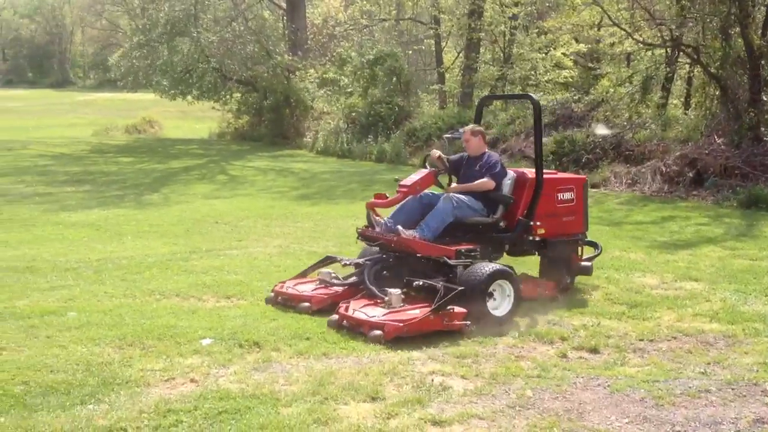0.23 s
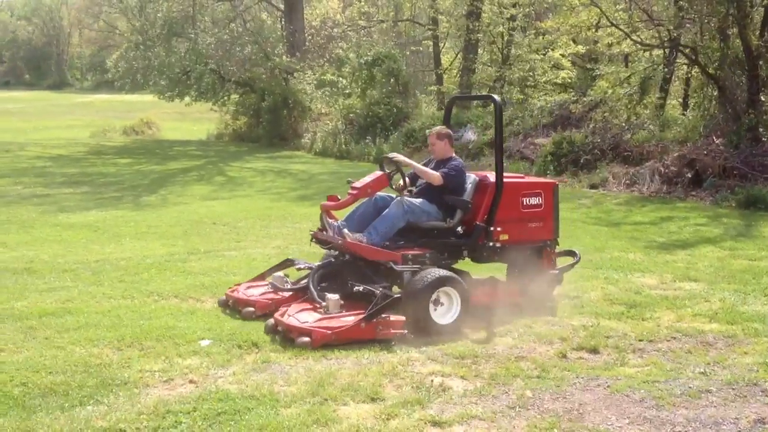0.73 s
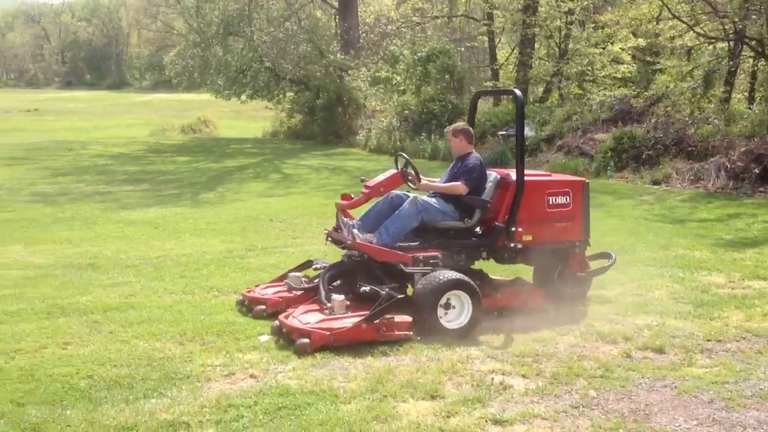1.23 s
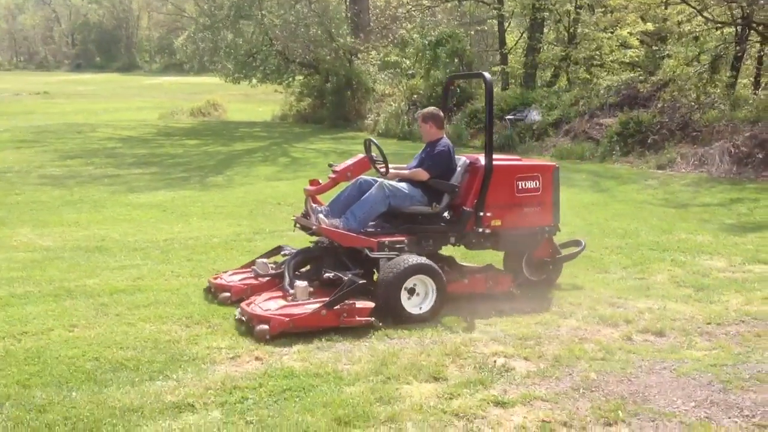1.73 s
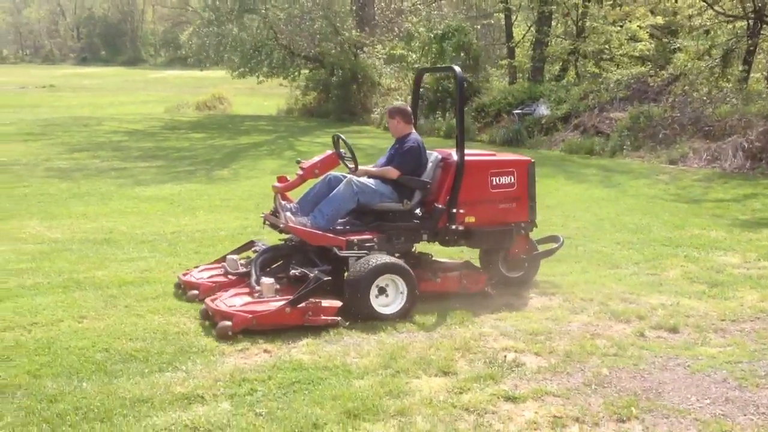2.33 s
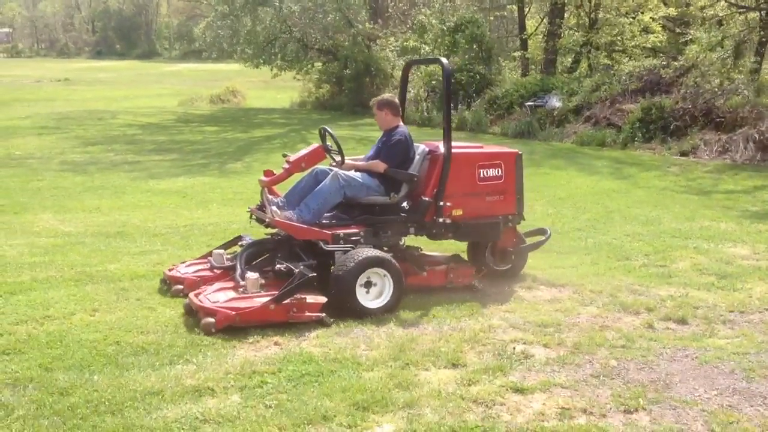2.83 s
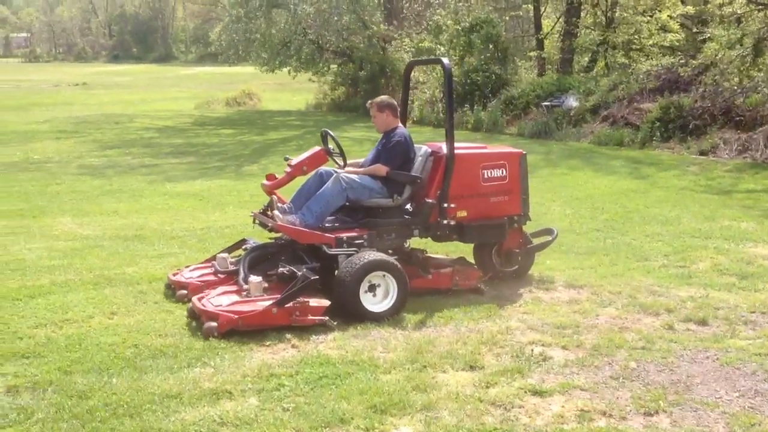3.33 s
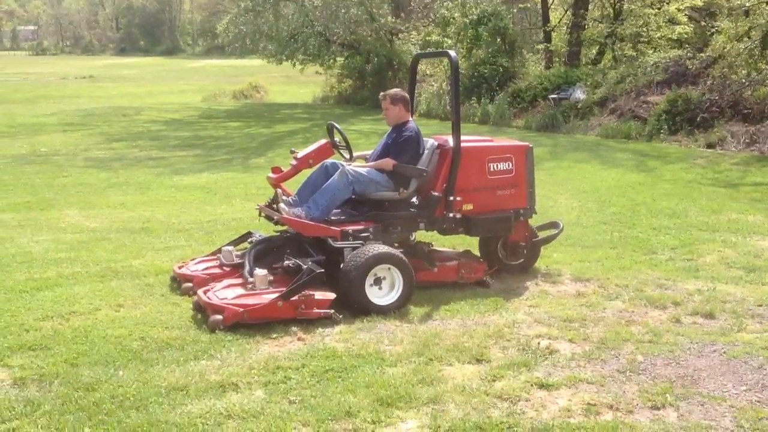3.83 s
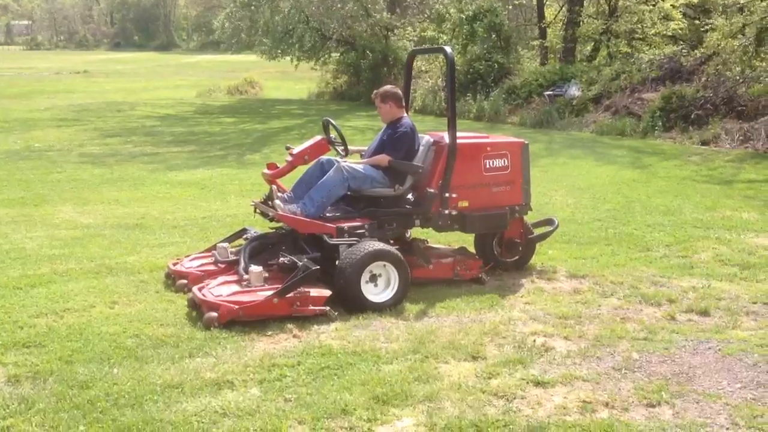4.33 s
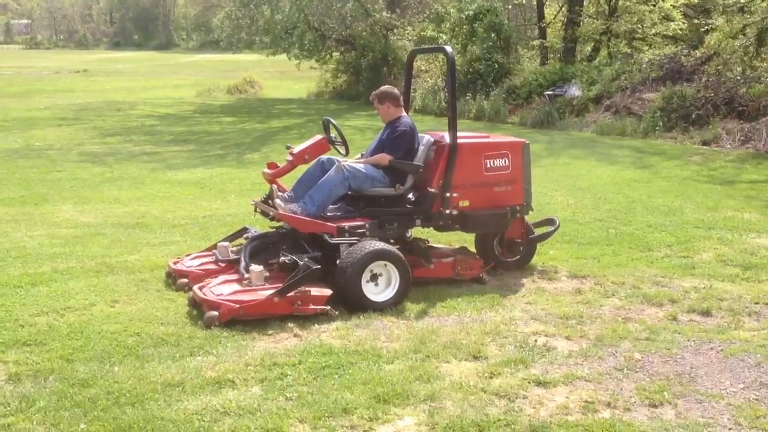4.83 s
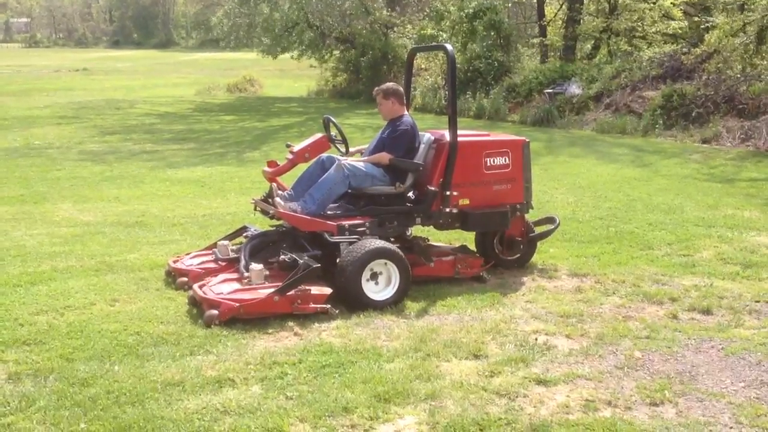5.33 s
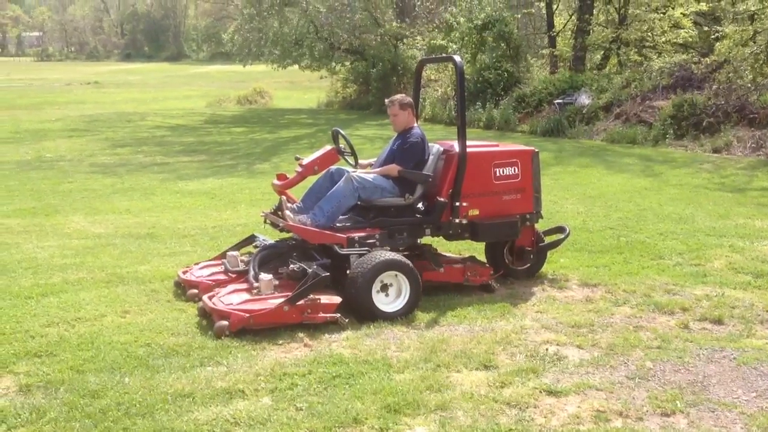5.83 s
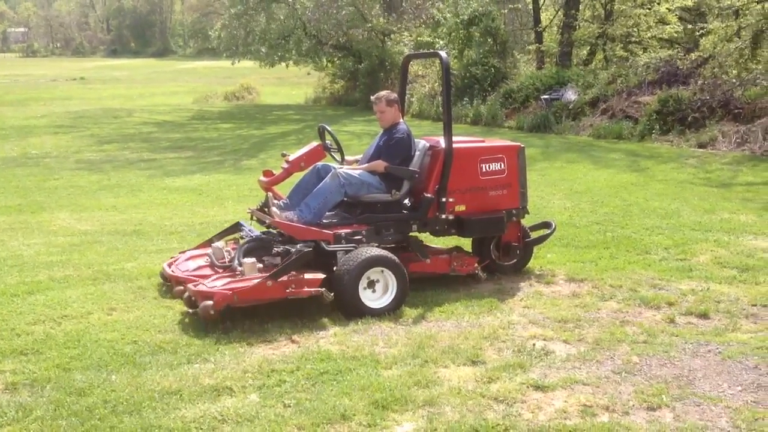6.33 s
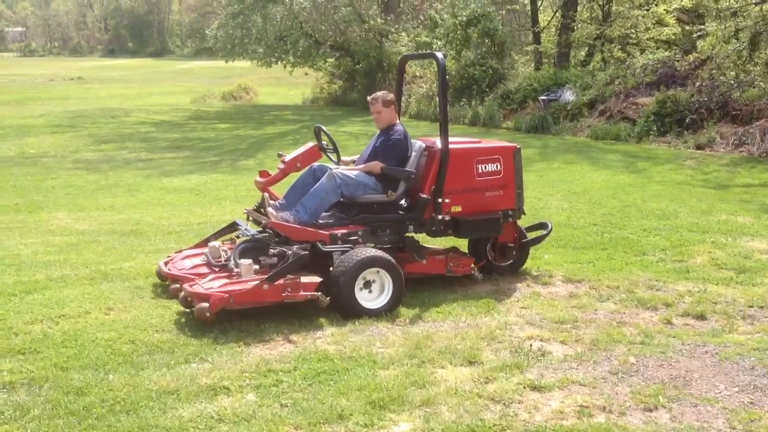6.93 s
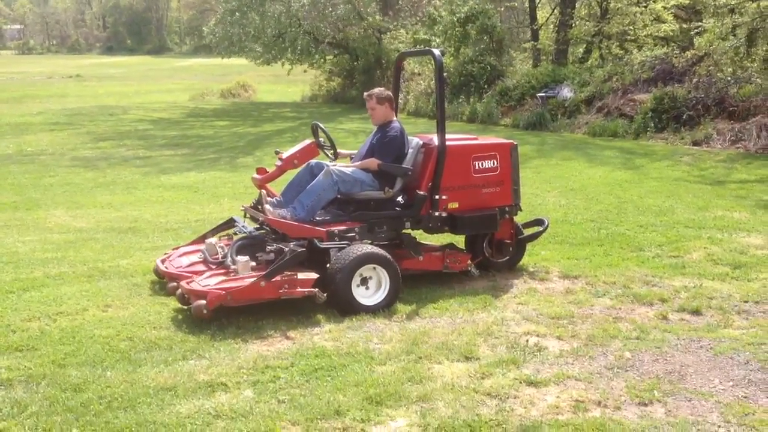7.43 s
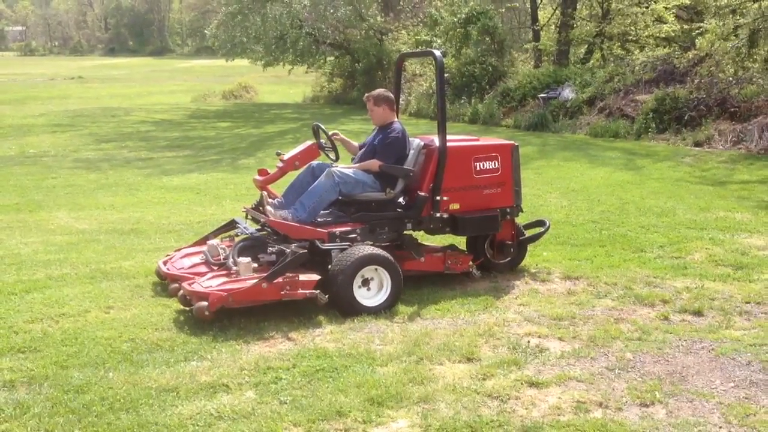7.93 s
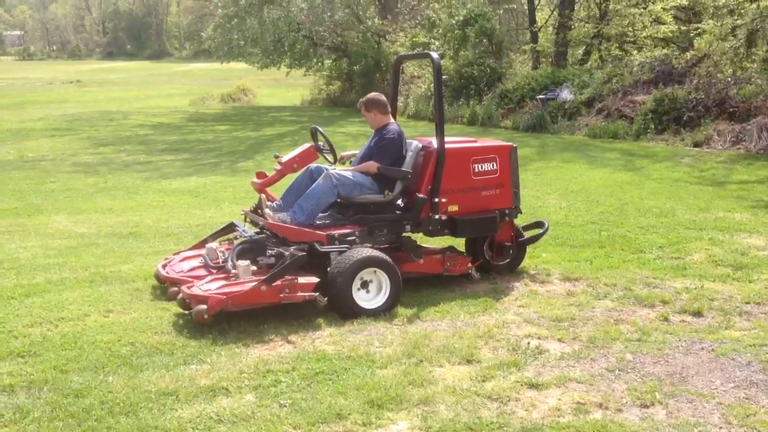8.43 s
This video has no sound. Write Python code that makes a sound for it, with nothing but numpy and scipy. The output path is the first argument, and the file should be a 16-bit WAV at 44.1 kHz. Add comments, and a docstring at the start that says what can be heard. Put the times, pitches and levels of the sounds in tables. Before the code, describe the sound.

A diesel riding mower runs at working throttle outdoors on grass, a rough roar with thin mechanical whine and wavering blade hum. Decks squeak and rattle in the first few seconds. At about five seconds the engine winds down quickly to a much quieter, knocking idle, and a lever clanks at six. Wind gusts rumble, flutter and slap on a small camera microphone, strongest at the start, around two to three seconds, and again near the end.

```python
"""On a lawn, a three-cylinder diesel riding mower drops from working throttle to idle at about five seconds.
Firing tones, a fan tone, pump whine and shaped noise make the engine; wavering tones and a rush, the blades.
Decks squeak (unsteady overtone stacks) and rattle (bright noise bursts), and a lever clanks (resonant chatter).
Gusts buffet the microphone of a small camera: low rumble, higher flutter, crackle, slaps and small knocks."""
import sys
import numpy as np
from scipy import signal
from scipy.fft import rfft, irfft, next_fast_len
from scipy.io import wavfile
from scipy.ndimage import uniform_filter1d

SR = 44100
rng = np.random.default_rng(int(sys.argv[2]) if len(sys.argv) > 2 else 0)


def inscribe(sig):
    """Save sig as 16-bit PCM at rate SR to the path in sys.argv[1].

    A 1-D sig is mono; a 2-D sig holds one channel per row.
    Samples are clipped to [-1, 1] before scaling.
    """
    pcm = np.round(np.clip(np.atleast_2d(sig).T, -1, 1) * 32767)
    wavfile.write(sys.argv[1], SR, pcm.astype(np.int16))


def ratio_of_db(decibels):
    """Turn decibels (scalar or array-like) into linear amplitude factors; 0 dB maps to 1."""
    return 10 ** (np.asarray(decibels, float) / 20)


N = 382347

# resonances of panels and hood: (centre [Hz], width [Hz], lift or dip [dB])
PANELS = [(545, 560, 3.5), (1140, 92, 0), (790, 47, -0.5), (1423, 540, 14.5), (2135, 300, 10),
          (2272, 122, 2.5), (2414, 120, -8), (3320, 510, -5.5), (3766, 330, 4), (4900, 570, 4.5),
          (7380, 300, 9.5), (8000, 420, 9), (10800, 370, 1), (14300, 4300, -16)]


def rms_one(x):
    """Scale to rms 1."""
    return x / np.sqrt(np.mean(x ** 2) + 1e-20)


def in_time(rows):
    """Columns of a table, interpolated to one value a sample."""
    s, *columns = np.transpose(rows)
    return [np.interp(np.arange(N) / SR, s, column) for column in columns]


def bell_db(hz, centre_hz, width_hz, lift_db):
    """Lift of one bell-shaped resonance, lift_db at its centre and half of that at its edges."""
    return lift_db / (1 + (2 * (hz - centre_hz) / width_hz) ** 2)


def coloured(x, spectrum, lifts=()):
    """Shape by a spectrum and bell-shaped resonances; rms 1."""
    size = next_fast_len(N)
    hz = np.fft.rfftfreq(size, 1 / SR) + 1
    points = np.array(spectrum)
    gain_db = np.interp(np.log(hz), np.log(points[:, 0]), points[:, 1], left=-60, right=-70)
    for lift in lifts:
        gain_db = gain_db + bell_db(hz, *lift)
    return rms_one(irfft(rfft(x, size) * ratio_of_db(gain_db), size)[:N])


def drift(corner_hz):
    """Slow chance of spread 1: noise through two equal low-pass poles, drawn every 40 samples."""
    r = np.exp(-80 * np.pi * corner_hz / SR)
    noise = rng.standard_normal(N // 40 + 2002)
    slow = signal.lfilter([1], [1, -2 * r, r * r], noise)[2000:]  # drops the filter's start
    return np.interp(np.arange(N) / 40, np.arange(len(slow)), rms_one(slow))


def resonance(x, hz, width_hz):
    """Two-pole band-pass with gain near 1 on top."""
    r = np.exp(-np.pi * width_hz / SR)
    zeros = np.array([1, 0, -1]) * (1 - r * r) / 2
    poles = [1, -2 * r * np.cos(2 * np.pi * hz / SR), r * r]
    return signal.lfilter(zeros, poles, x + 1e-18)


def add(out, s, piece):
    """Mix a short sound in at a time."""
    i = max(round(s * SR), 0)
    out[i:i + len(piece)] += piece[:N - i]


def engine(per_s, fan_db, roar_db, hiss_db):
    """Low orders as tones, a five-fold fan tone, a roar that knocks at each firing, and a grainy hiss."""
    # low tones: (multiple of firing rate, level [dB])
    firing_orders = [(2, -56), (3, -52), (4, -54), (8, -54)]
    # knock strength of each cylinder in turn: level [dB]
    cylinder_db = [0, -3, -5]
    # spectrum of exhaust and cooling roar: (frequency [Hz], density [dB])
    roar_spectrum = [(35, -68), (60, -50), (141, -14.5), (333, -3.5), (374, -10), (540, -15.5), (731, -12),
                     (1130, -24.5), (2220, -18), (2500, -20), (4880, -21), (6150, -31), (15200, -50.5)]
    # spectrum of belts and fan air: (frequency [Hz], density [dB])
    hiss_spectrum = [(240, -51), (400, -16.5), (882, -7), (1040, -19.5), (2100, -6.5), (2410, -2.5),
                     (6280, -15.5), (8260, -11.5), (11700, -21.5), (15200, -18)]
    firings = np.cumsum(per_s * (1 + .0012 * drift(6))) / SR  # running count
    tones = sum(ratio_of_db(db + 3 * drift(6)) * np.sin(2 * np.pi * k * firings) for k, db in firing_orders)
    fan_level_db = fan_db + 1.5 * drift(6) + 2 * drift(30)
    fan = ratio_of_db(fan_level_db) * np.sin(10 * np.pi * firings + .3 * drift(15))

    number = firings.astype(int)
    strength_db = np.array(cylinder_db)[number % 3] + 1.5 * rng.standard_normal(N)[number]
    knock = ratio_of_db(strength_db) * np.exp(-5 * (firings % 1))
    steady = (per_s / 62) ** 3.5  # air rush grows with speed and buries the knocks
    pulsing = (steady + knock) / (steady + .2)

    # valve gear and loose fasteners tick at random, 8 per firing on average, 11 dB over the roar's grain
    ticks = ratio_of_db(11) * (rng.random(N) < 8 * per_s / SR)
    roar_grain = (ratio_of_db(0.69 * drift(19)) + ticks) * rng.standard_normal(N)
    roar = coloured(pulsing * roar_grain, roar_spectrum, PANELS)
    hiss = coloured(ratio_of_db(0.99 * drift(73)) * rng.standard_normal(N), hiss_spectrum, PANELS)
    roar = ragged_bands(roar, depth_db=2.8, width_hz=110)
    hiss = ragged_bands(hiss, depth_db=2.5, width_hz=54)
    return tones + fan + pump(firings, per_s) + ratio_of_db(hiss_db) * hiss + ratio_of_db(roar_db) * roar


def pump(firings, per_s):
    """Hydraulic pump and gears whine on thin lines locked to engine speed, sinking between idle and full."""
    # pump whine: (multiple of stroke rate, level at full speed [dB], level at idle [dB])
    pump_orders = [(1, -50, -60), (2, -46, -55), (3, -54, -51), (4, -60, -54), (4.5, -50, -64),
                   (6.5, -57, -59), (7, -55, -70), (8, -57, -70), (8.5, -66, -57), (9, -51, -70),
                   (10, -54, -70), (11, -58, -72)]
    # gear whine: (multiple of firing rate, level at full speed [dB])
    gear_whines = [(10, -46), (20.52, -49), (30.42, -46.5), (35.73, -55)]
    strokes_per_firing = 5.72
    fast = (per_s - per_s.min()) / np.ptp(per_s)  # 0 at the slowest, 1 at the fastest
    slack_db = -30 * fast * (1 - fast)
    lines = [(k * strokes_per_firing, idle_db + fast * (full_db - idle_db))
             for k, full_db, idle_db in pump_orders]
    lines += [(k, full_db - 30 * (1 - fast)) for k, full_db in gear_whines]
    return sum(ratio_of_db(db + slack_db + 3 * drift(5)) * np.sin(2 * np.pi * k * firings) for k, db in lines)


def ragged_bands(x, depth_db, width_hz):
    """Random narrow ripple makes noise streaky, slightly tonal, shifting slowly between two patterns; rms 1."""
    size = next_fast_len(N)
    noise = rng.standard_normal((2, size // 2 + 1))
    ripple = uniform_filter1d(noise, max(round(width_hz * size / SR), 1))
    first, second = irfft(rfft(x, size) * ratio_of_db(depth_db * rms_one(ripple)), size)[:, :N]
    share = .5 + .5 * np.tanh(1.5 * drift(2))
    return rms_one(share * first + (1 - share) * second)


def blades(drone_db):
    """Several blades at nearly equal speed give wavering tones over a hollow rush under the decks."""
    # blade tones: (frequency [Hz], level [dB], wander [Hz])
    blade_tones = [(144.4, -15.5, 2.12), (208.8, -4.5, 3), (245, -13, 4.06), (283.3, -3, 3.49),
                   (433, -15.5, 2.18), (764, -14, 8.19)]
    # spectrum of the rush of air: (frequency [Hz], density [dB])
    air_spectrum = [(450, -15), (700, 1), (900, 4), (1100, -11.5), (1500, -31), (3000, -17)]
    hum = sum(ratio_of_db(db) * wavering(hz, wander_hz) for hz, db, wander_hz in blade_tones)
    swell_db = 2 * drift(12)
    rush = coloured(ratio_of_db(swell_db) * rng.standard_normal(N), air_spectrum)
    return ratio_of_db(drone_db) * (hum + ratio_of_db(-3.5) * rush)


def wavering(hz, wander_hz):
    """A tone that wanders in pitch and swells as near-equal blades beat; rms 1."""
    turns = np.cumsum(hz + wander_hz * drift(3)) / SR
    swell_db = 3.5 * drift(4) + 2 * drift(20)
    return rms_one(ratio_of_db(swell_db) * np.sin(2 * np.pi * turns))


def squeaks():
    """Stick-slip tones of dry joints: an overtone stack with unsteady pitch, swelling and fading."""
    # squeaks: (time of middle [s], half-length [s], start pitch [Hz], glide over the squeak [Hz],
    # level before panel lift [dB], fall per overtone [dB])
    squeak_rows = [(.585, .06, 2190, 0, -17, 25), (.578, .045, 2660, -80, -22, 6),
                   (.595, .02, 3800, 0, -30, 30), (.68, .02, 2200, 0, -27, 20),
                   (.915, .022, 1860, 0, -22, 9), (.91, .012, 3700, 0, -26, 25),
                   (.905, .01, 4900, 0, -32, 30), (1.015, .06, 1860, 0, -26, 8),
                   (1.025, .045, 2150, 0, -26, 20), (1.025, .03, 5550, 0, -35, 30),
                   (1.02, .04, 3750, 0, -30, 30), (1.01, .03, 2800, 0, -30, 20),
                   (1.035, .035, 2650, 450, -26, 14), (1.03, .045, 4750, 0, -28, 30),
                   (1.03, .045, 7500, 0, -40, 30), (5.78, .02, 3000, 0, -39, 25),
                   (6.04, .09, 540, 460, -28, 10)]
    blur_hz = 11  # line width of a squeak at 2 kHz; higher and lower ones are wider
    out = np.zeros(N)
    for s, length, hz, glide_hz, level_db, fall_db in squeak_rows:
        t = np.arange(round(2 * length * SR)) / SR
        glide = np.cumsum(hz + glide_hz * t / (2 * length)) / SR
        wander = np.sqrt(2 * np.pi * blur_hz / SR) * (1 + abs(hz - 2000) / 3000)
        phase = 2 * np.pi * glide + wander * np.cumsum(rng.standard_normal(SR)[:len(t)])
        stack = sum(ratio_of_db(-fall_db * k + panel_lift_db((k + 1) * hz)) * np.sin((k + 1) * phase)
                    for k in range(5))
        swell = np.exp(-8 * (t / length - 1) ** 2)
        add(out, s - length, ratio_of_db(level_db) * stack * swell)
    return out


def panel_lift_db(hz):
    """How much the panel resonances centred above 6 kHz lift a tone."""
    return sum(bell_db(hz, *panel) for panel in PANELS if panel[0] > 6000)


def rattles():
    """Loose parts rattle: bursts of bright grit that swell and die, coloured by the panels."""
    # rattles: (start [s], strength before swell and filters [dB], rise [s], 60 dB decay [s], top edge [Hz])
    rattle_rows = [(.128, -27, 0.0024, 0.13, 5960), (0.157, -17.5, 0.0095, 0.17, 5560),
                   (.2, -26, 0.0074, 0.12, 7900), (0.276, -25, 0.0022, 0.056, 5550),
                   (0.353, -23.5, 0.0022, 0.048, 5630), (0.56, -11, 0.029, 0.16, 6500),
                   (.674, -19.5, 0.0034, 0.06, 5370), (0.993, -19, 0.017, 0.14, 8100),
                   (1.343, -18.5, 0.004, 0.094, 5070), (2.291, -12, 0.018, 0.088, 4400),
                   (2.946, -18.5, 0.01, 0.057, 12000), (5.586, -35, 0.0043, 0.052, 11500)]
    band_octaves = 1.94
    grit = np.zeros(N)
    t = np.arange(round(.25 * SR)) / SR
    for s, strength_db, rise, t60, high_hz in rattle_rows:
        swell = (1 - np.exp(-t / rise)) ** 2
        burst = rng.standard_normal(len(t)) * swell * ratio_of_db(strength_db - 60 * t / t60)
        edges_hz = [high_hz / 2 ** band_octaves, high_hz]
        band = signal.butter(3, edges_hz, "band", fs=SR, output="sos")
        add(grit, s, signal.sosfilt(band, burst))
    ringing = sum(ratio_of_db(lift_db) * resonance(grit, hz, width_hz)
                  for hz, width_hz, lift_db in PANELS if lift_db > 0)
    return grit + ringing


def lever():
    """Each knock of the lever on its stop shakes the linkage: dying chatter through broad resonances."""
    # knocks: (start [s], strength before rise and resonances [dB], 60 dB decay [s])
    clanks = [(5.974, -11.5, 0.13), (6.013, -16, 0.08)]
    # resonances of the linkage: (centre [Hz], width [Hz], relative level [dB])
    linkage = [(607, 160, 0), (910, 88, 1), (1360, 130, 0), (2040, 120, 4.5), (2870, 440, -6.5),
               (4580, 650, -8), (7670, 770, -17), (12000, 3300, -36)]
    chatter = np.zeros(N)
    t = np.arange(round(.25 * SR)) / SR
    for s, strength_db, t60 in clanks:
        rise = 1 - np.exp(-t / 0.0046)
        add(chatter, s, rng.standard_normal(len(t)) * rise * ratio_of_db(strength_db - 60 * t / t60))
    # neighbouring resonances have opposite sign
    return sum(ratio_of_db(db + 10.5) * resonance(chatter, hz, width_hz) * (-1) ** k
               for k, (hz, width_hz, db) in enumerate(linkage))


def wind():
    """Lumpy turbulence in a low rumble and a higher flutter, with slaps and knocks of a few cycles."""
    # spectra of rumble, flutter and crackle: (frequency [Hz], density [dB])
    low_spectrum = [(30, -49), (60, -37), (100, -6), (150, 6), (250, 6.5), (400, -5), (800, -42)]
    high_spectrum = [(150, -52), (350, 21.5), (700, 14.5), (1200, -10), (2000, -24), (4000, -55)]
    tearing_spectrum = [(400, -36), (900, 10), (1500, 0.5), (2500, -12), (4000, -33)]
    # single slaps and small knocks at set times, from hard to faint:
    # (start [s], peak before the treble cut [dB], centre [Hz])
    timed_slaps = [(0.023, -6, 300), (0.042, -20, 250), (0.067, -8, 250), (.1, -12, 400), (0.181, 4.5, 300),
                   (.187, -23, 700), (0.223, -6, 500), (0.235, -9, 450), (1.199, -10, 600),
                   (1.261, -13, 250), (1.345, -10.5, 400), (1.36, -16, 600), (1.649, -16, 603),
                   (2.269, -8, 400), (2.312, -19, 900), (2.326, -6, 1000), (2.382, -7, 514),
                   (2.405, -8, 300), (2.412, -12, 350), (2.447, -1, 276), (2.6, -14, 450), (2.618, -8, 600),
                   (2.699, -10, 400), (2.706, -16, 1000), (2.714, -13, 1100), (2.738, -16, 450),
                   (2.813, -4.5, 506), (2.878, -11, 500), (2.984, -10, 300), (3.002, -5.5, 420),
                   (3.184, -14, 260), (3.222, -22, 260), (3.289, -22, 330), (3.631, -16, 417),
                   (4.618, -13, 280), (4.989, -1.5, 466), (5.367, -19, 350), (5.626, -20.5, 278),
                   (5.46, -29, 330), (5.699, -26, 280), (5.77, -23, 230), (5.912, -26, 300),
                   (6.815, -24, 219), (7.213, -12, 406), (7.264, -21, 400), (7.318, -10, 450),
                   (7.536, -20, 500), (7.581, -5.5, 300), (8.057, -13, 500), (8.261, -6, 395),
                   (8.311, -32, 300), (8.369, -11, 450), (8.467, -2, 450), (8.478, -9, 600),
                   (8.521, -17, 500), (8.533, -14, 300), (8.594, -4.5, 450), (8.602, -11, 700)]
    rumble_db, flutter_db = wind_force()
    lumps_db = 4.5 * np.tanh(drift(45))
    flicker = ratio_of_db(lumps_db + 5 * np.tanh(drift(120)))
    out = rms_one(ratio_of_db(lumps_db) * coloured(rng.standard_normal(N), low_spectrum)) * ratio_of_db(rumble_db)
    out += rms_one(flicker * coloured(rng.standard_normal(N), high_spectrum)) * ratio_of_db(flutter_db)
    # hard, fast gusts tear at the grille and crackle
    tearing_db = 2.22 * flutter_db - 1.29 * rumble_db - 9.0
    out += rms_one(flicker * coloured(rng.standard_normal(N), tearing_spectrum)) * ratio_of_db(tearing_db)
    for s, peak_db, hz in timed_slaps + random_slaps((rumble_db + flutter_db) / 2):
        add(out, s, ratio_of_db(peak_db) * slap(hz))
    return signal.sosfilt(signal.butter(4, 4300, fs=SR, output="sos"), out)  # eddies carry no treble


def slap(hz):
    """A short drop of pressure and a puff of noise set a broad eddy swinging; peak 1."""
    t = np.arange(round(.06 * SR)) / SR
    suck = -np.exp(-.5 * ((t - .0015) / .00025) ** 2)
    puff = rng.standard_normal(len(t)) * (1 - np.exp(-t / 0.0016)) * np.exp(-t / 0.0009)
    push = suck + 0.12 * puff
    eddy = resonance(push, hz, .9 * hz)
    eddy += .4 * resonance(push, 2.5 * hz, 2.5 * hz)
    eddy += .1 * resonance(suck, 2500, 2500) + .15 * suck
    return eddy / np.abs(eddy).max()


def wind_force():
    """Rumble and flutter in dB: the breeze, overtaken by buffets that rise, hold and fall."""
    # rumble of the wind between buffets: (time [s], level [dB])
    breeze = [(0, -19), (.27, -22), (.36, -38), (.75, -28.5), (1.3, -28.5), (1.45, -32), (2.25, -28),
              (2.6, -20.5), (3.3, -25), (3.7, -31.5), (4.4, -33), (4.95, -30), (5.05, -34.5), (5.35, -41),
              (5.58, -39), (6.75, -39.5), (7.15, -31.5), (7.6, -20), (7.72, -35.5), (8.0, -30), (8.2, -26),
              (8.67, -29)]
    # buffets at the microphone: (start of full force [s], hold [s], rumble level [dB], flutter level [dB])
    buffets = [(0.022, 0.047, -13.5, -18), (0.074, 0.14, -18.5, -19), (0.217, 0.046, -15.5, -16),
               (0.46, 0.046, -24, -33.5), (1.33, 0.056, -24.5, -22.5), (2.252, 0.05, -22.5, -17.5),
               (2.287, 0.05, -24.5, -16.5), (2.353, 0.14, -17, -18), (2.483, 0.019, -12, -18),
               (2.596, 0.042, -18.5, -17), (2.695, 0.023, -26, -18.5), (2.745, 0.11, -20.5, -22),
               (2.855, 0.044, -17, -20), (2.921, 0.022, -20, -21), (2.968, 0.058, -19, -20.5),
               (3.045, 0.053, -20.5, -23), (3.197, 0.055, -18.5, -31), (3.268, 0.037, -20, -25),
               (3.42, 0.097, -19, -26.5), (4.612, 0.013, -17.5, -27), (4.842, 0.025, -22, -36),
               (4.974, 0.024, -17.5, -20.5), (5.356, 0.059, -25.5, -43), (5.75, 0.034, -27, -52),
               (5.882, 0.046, -25, -39), (6.43, 0.026, -32, -59), (6.494, 0.14, -25, -37),
               (7.037, 0.019, -24, -33.5), (7.216, 0.029, -18, -21), (7.265, 0.047, -16, -22),
               (7.36, 0.045, -18.5, -36), (7.396, 0.015, -14, -20.5), (7.474, .02, -21, -44),
               (7.541, 0.13, -15, -20), (7.817, 0.026, -22.5, -43), (8.038, 0.049, -16.5, -29),
               (8.101, 0.037, -21, -34), (8.227, 0.062, -17.5, -28.5), (8.301, 0.035, -17.5, -29.5),
               (8.38, 0.031, -17.5, -22.5), (8.468, 0.022, -16.5, -18), (8.589, 0.023, -15.5, -17.5)]
    rumble_rise, rumble_fall, flutter_rise, flutter_fall = 444, 338, 753, 552  # dB per s
    rumble_db, = in_time(breeze)
    flutter_db = rumble_db - 18
    t = np.arange(N) / SR
    for s, hold, low_db, high_db in buffets:
        early, late = np.maximum(s - t, 0), np.maximum(t - s - hold, 0)
        arch_db = 7 * np.minimum((2 * (t - s) / hold - 1) ** 2, 1)  # ends of the hold lie 7 dB down
        rumble_db = np.maximum(rumble_db, low_db - arch_db - rumble_rise * early - rumble_fall * late)
        flutter_db = np.maximum(flutter_db, high_db - arch_db - flutter_rise * early - flutter_fall * late)
    return rumble_db, flutter_db


def random_slaps(force_db):
    """Further slaps at random, as hard as the wind of the moment: (start [s], peak [dB], centre [Hz])."""
    per_s, over_wind_db, low_hz, high_hz = 30, 6, 194, 610
    wait, size, pitch = rng.random((400, 3)).T
    s = np.cumsum(-np.log(1 - wait)) / per_s
    peak_db = over_wind_db + 8 * (size - .5)
    rows = np.c_[s, peak_db, low_hz * (high_hz / low_hz) ** pitch][s < N / SR]
    return [(s, db + force_db[int(s * SR)], hz) for s, db, hz in rows]


def scene():
    """Machine and wind meet at one microphone."""
    # the machine: (time [s], roar level [dB], hiss level [dB], blade drone gain [dB])
    machine_levels = [(0.0, -31, -37, -25.5), (0.51, -32.5, -40, -30.5), (1.28, -28, -38.5, -25),
                      (2.2, -28.5, -35.5, -24.5), (2.46, -34, -41, -28.5), (3.26, -34, -37.5, -40),
                      (4.75, -29.5, -40, -33), (5.38, -41.5, -44, -48), (7.56, -46.5, -43.5, -45.5),
                      (8.67, -45.5, -45, -67)]
    # throttle: (time [s], firing rate [per s], fan tone level [dB])
    throttle = [(0, 73.4, -33), (.75, 73.1, -32), (2.2, 73.9, -30), (3.2, 74.7, -31), (4.2, 74.7, -31),
                (4.92, 74.4, -29), (5.07, 63, -37), (5.17, 58, -30), (5.32, 49.5, -29.5), (5.4, 43.5, -35),
                (5.52, 38.3, -46), (5.8, 37.9, -46), (8.67, 37.9, -45)]
    roar_db, hiss_db, drone_db = in_time(machine_levels)
    machine = engine(*in_time(throttle), roar_db, hiss_db) + blades(drone_db)
    return (machine + squeaks() + rattles() + lever() + wind())[None]


def roll_off(x):
    """The treble ends steeply here."""
    return signal.sosfilt(signal.butter(12, 15320, fs=SR, output="sos"), x)


def record(dry):
    """Camera microphone: faint electronic hiss, a steep bass cut against wind, peaks flattened at a ceiling."""
    # spectrum of the electronic hiss: (frequency [Hz], density [dB])
    camera_spectrum = [(5000, -36), (9000, -7), (11600, -12), (13000, 2), (15300, -3)]
    ceiling = .71
    noisy = dry + ratio_of_db(-60.5) * coloured(rng.standard_normal(N), camera_spectrum)
    thin = signal.sosfilt(signal.butter(3, 74, "high", fs=SR, output="sos"), noisy)
    flattened = thin / (1 + np.abs(thin / ceiling) ** 8) ** (1 / 8)
    return roll_off(flattened)


dry = scene()
out = record(dry)
inscribe(out)
```